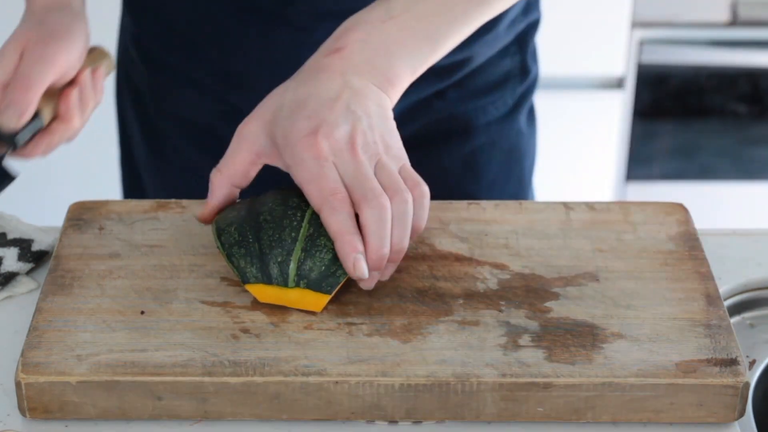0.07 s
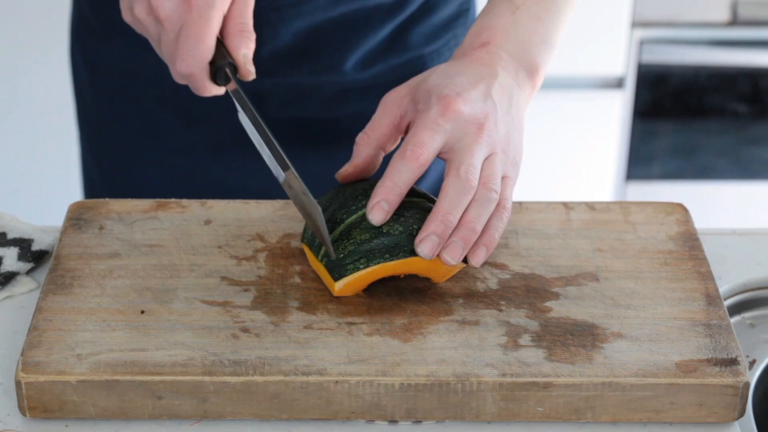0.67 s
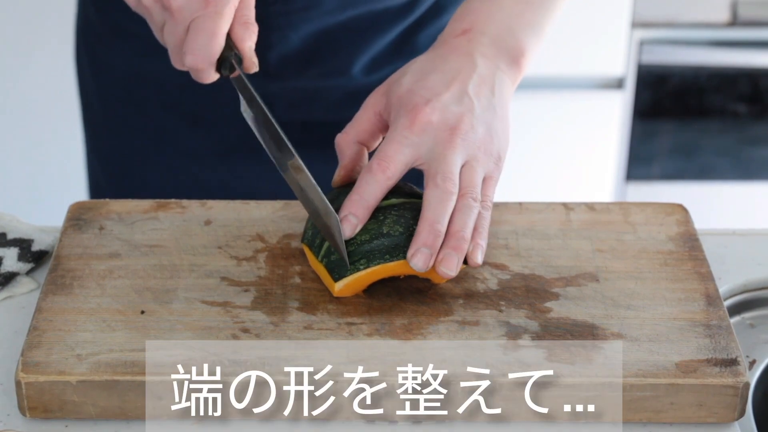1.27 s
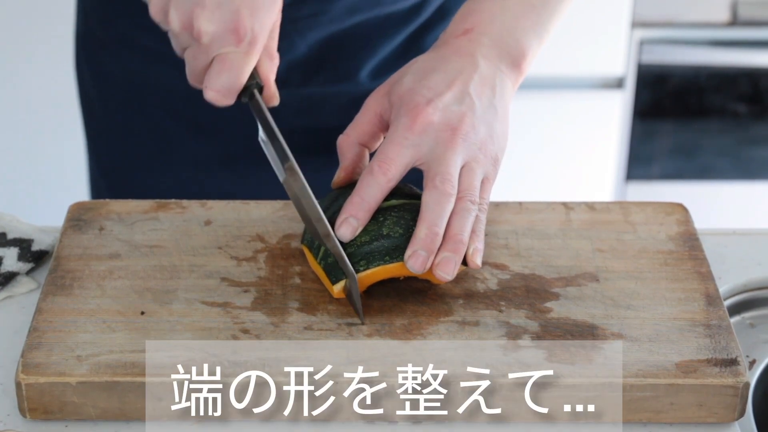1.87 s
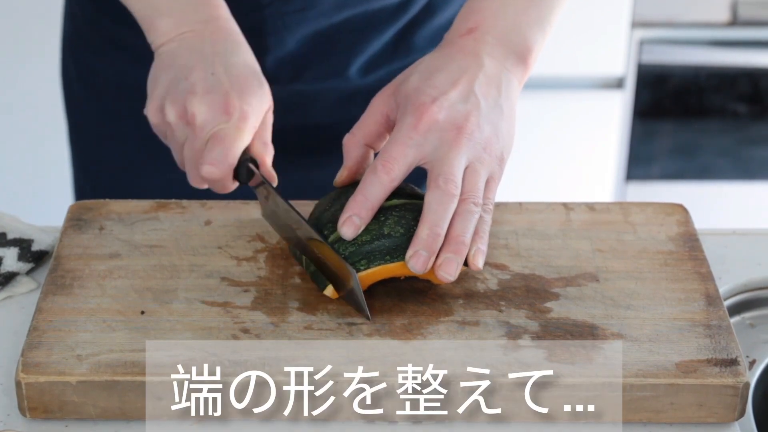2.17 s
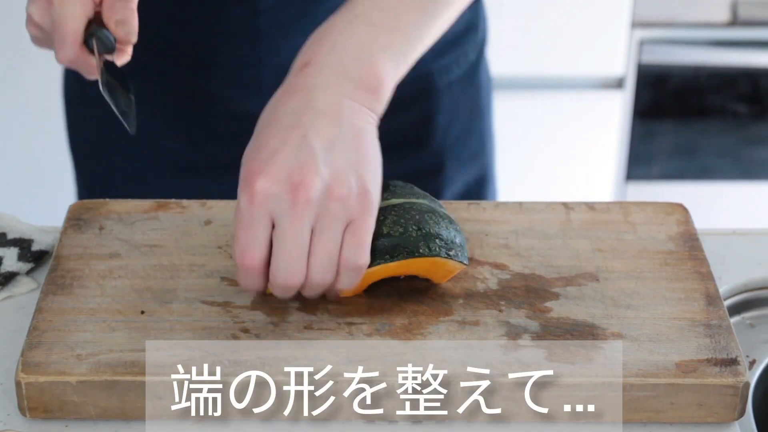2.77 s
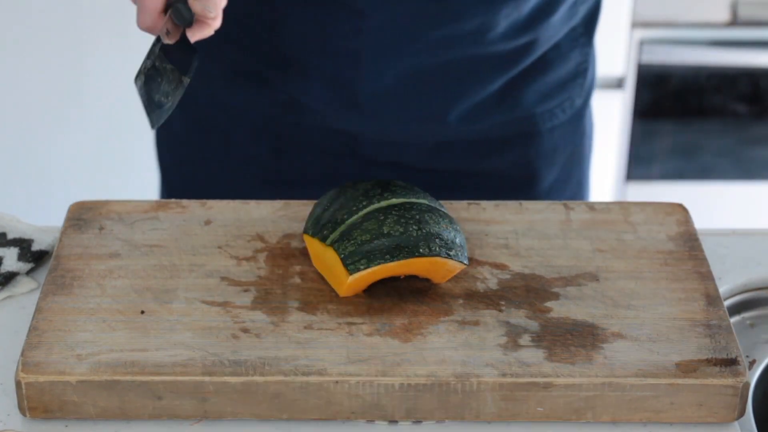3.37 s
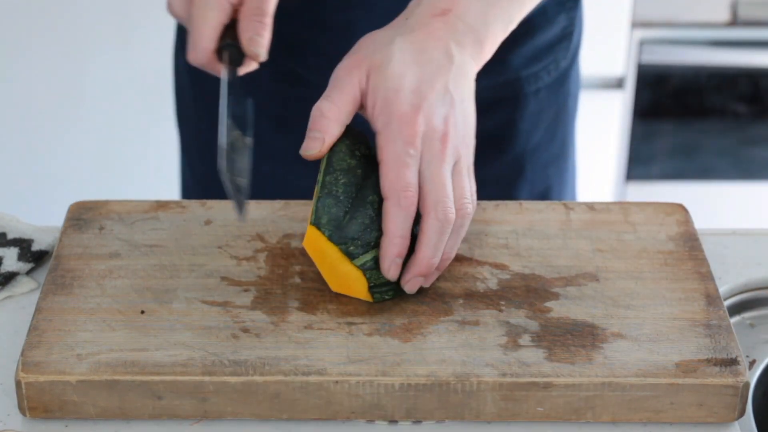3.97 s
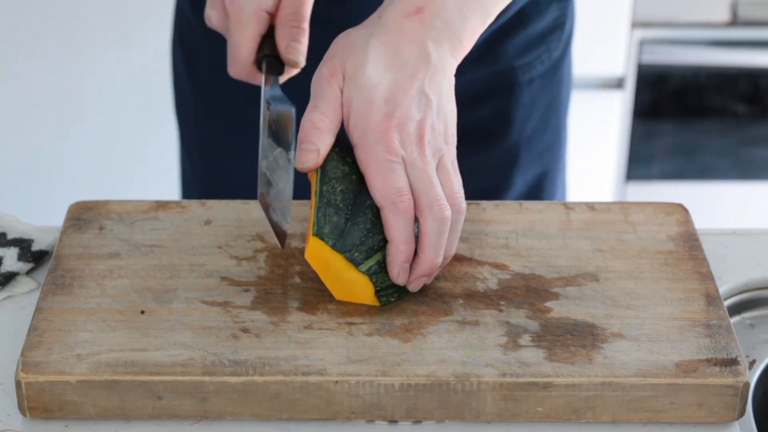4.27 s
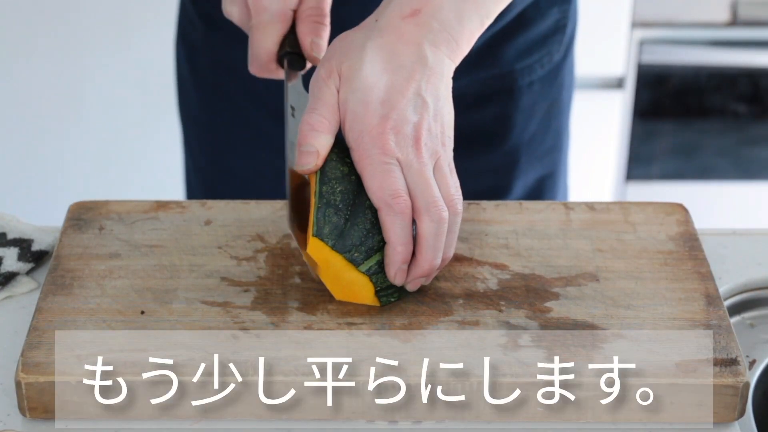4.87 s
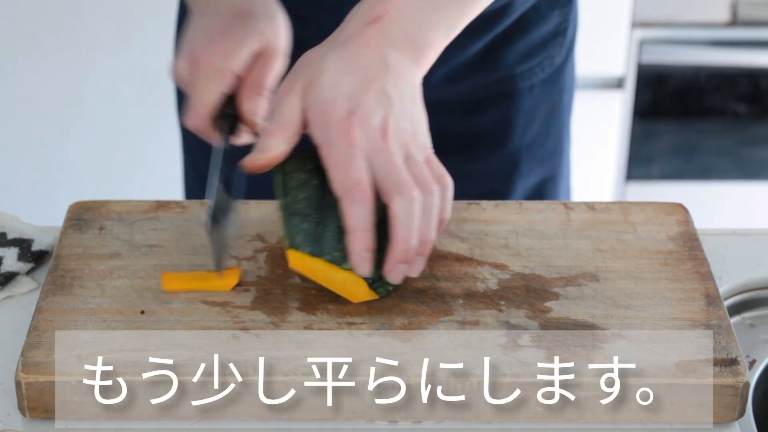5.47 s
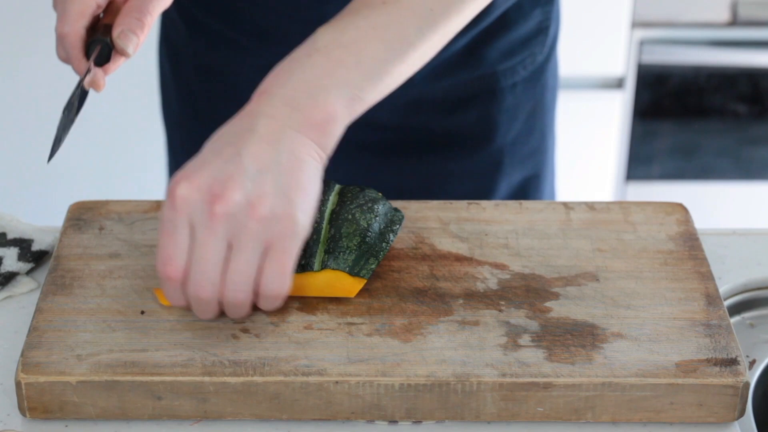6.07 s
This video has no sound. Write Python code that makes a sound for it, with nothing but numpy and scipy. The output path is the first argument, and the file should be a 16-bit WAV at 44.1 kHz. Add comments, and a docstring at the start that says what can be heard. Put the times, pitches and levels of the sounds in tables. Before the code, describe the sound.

Close sounds in a small, lively kitchen, over a faint steady appliance hum and light rustling of skin and apron. During the first second, fingers slip and squeak softly on damp pumpkin rind. From about 1.2 seconds a knife pushes through the firm flesh with a growing, crisp crunch, the rind cracking sharply at 1.7 and 2.0. The blade knocks on the wooden board at 2.3, and soft thuds follow around 2.6. One sharp finger snap comes at 3.3, then soft pats and squeaks. At 3.8 the pumpkin lands with a solid knock that booms in the counter. A second, shorter cut crunches from 4.6 and ends in a crack at 5.1. Around 5.3 the blade scrapes over the wood with a brief, high metallic squeal. Two light bumps follow near 5.5, and a firmer double knock comes at 5.9.

```python
"""A small, lively kitchen: a knife trims firm pumpkin on a thick wooden board.
Two slow cuts crunch as cells burst and the rind cracks; knocks ring the board and boom in the counter.
Between the cuts the free hand snaps its fingers and stands the pumpkin on end, with pats and squeaks.
After the second cut the blade scrapes over the wood and squeals briefly.
Skin and apron rustle; an appliance hums behind."""
import sys
import numpy as np
from scipy import signal
from scipy.fft import rfft, irfft, next_fast_len
from scipy.io import wavfile

SR = 44100
rng = np.random.default_rng(int(sys.argv[2]) if len(sys.argv) > 2 else 0)


def file_out(sig):
    """Save sig as 16-bit WAV at sys.argv[1]."""
    # one column per channel
    cols = np.atleast_2d(sig).T
    # limit, then scale
    lim = np.clip(cols, -1, 1)
    pcm = np.round(lim * 32767).astype(np.int16)
    wavfile.write(sys.argv[1], SR, pcm)


N = 269451
TIME_S = np.arange(N) / SR


def from_db(db):
    """Decibels to gain."""
    return 10 ** (np.asarray(db) / 20)


def unit_power(x):
    """Scale to RMS 1."""
    return x / np.sqrt(np.mean(x ** 2) + 1e-20)


def at_hz(points, hz):
    """Interpolate a table over log frequency."""
    points_hz, values = np.transpose(points)
    return np.interp(np.log(np.maximum(hz, 1)), np.log(points_hz), values)


def add(out, start_s, sound):
    """Mix a sound in at start_s."""
    start = int(start_s * SR)
    out[start:start + len(sound)] += sound[:N - start]


def butterworth(x, kind, hz, order=2):
    """Causal low-, high- or band-pass."""
    return signal.sosfilt(signal.butter(order, hz, kind, fs=SR, output="sos"), x)


def colour(x, spectrum):
    """Minimum-phase filter from (freq_hz, gain_db) points; unit power."""
    size = 2 * next_fast_len(len(x) // 2 + 1)
    gain = from_db(at_hz(spectrum, np.fft.rfftfreq(size, 1 / SR)))
    cepstrum = irfft(np.log(gain))
    response = np.exp(rfft(2 * cepstrum[:size // 2], size))
    return unit_power(irfft(rfft(x, size) * response)[:len(x)])


def pole_pair(hz, width_hz):
    """Denominator of one resonance."""
    radius = np.exp(-np.pi * width_hz / SR)
    return [1, -2 * radius * np.cos(2 * np.pi * hz / SR), radius ** 2]


def resonate(x, peaks):
    """Parallel resonances (freq_hz, width_hz, gain_db) of alternating sign; unit power."""
    out = 0
    for k, (hz, width_hz, gain_db) in enumerate(peaks):
        poles = pole_pair(hz, width_hz)
        gain = (-1) ** k * from_db(gain_db) * (1 - poles[2])
        out += gain * signal.lfilter([1, 0, -1], poles, x)
    return unit_power(out)


def fade(t60_s):
    """Exponential decay, 1 s buffer."""
    return np.exp(-np.log(1000) * TIME_S[:SR] / t60_s)


def ring(hz, t60_s):
    """One struck mode."""
    return np.sin(2 * np.pi * hz * TIME_S[:SR]) * fade(t60_s)


def burst(spectrum, t60_s):
    """Decaying coloured noise, starting at unit power."""
    decay = fade(t60_s)
    return colour(rng.standard_normal(SR) * decay, spectrum) * np.sqrt(np.mean(decay ** 2))


def grains(rate_per_s, spread_db):
    """Random clicks of uneven size."""
    sizes = from_db(spread_db * np.minimum(rng.exponential(1, N), 4))
    signs = rng.choice([-1, 1], N)
    return sizes * signs * (rng.random(N) < rate_per_s / SR) + 1e-18


def stroke(start_s, length_s, growth_db, release_t60_s, attack_s):
    """Push envelope: bite, ramp by growth_db to gain 1, release."""
    age_s = TIME_S - start_s
    bite = np.clip(age_s / attack_s, 0, 1)
    ramp = from_db(growth_db * (np.clip(age_s / length_s, 0, 1) - 1))
    release = np.exp(-np.log(1000) * np.maximum(age_s - length_s, 0) / release_t60_s)
    return bite * ramp * release


# freq_hz, gain_db
ROOM_NOISE_SPECTRUM = [(15, -54), (25, -12), (64, -21), (80, -11.5), (108, -2.5), (242, -12), (326, -13.5),
                       (405, -18.5), (641, -16.5), (714, -16), (818, -17.5), (1840, -23.5), (2000, -29),
                       (6560, -29.5), (16000, -44)]


def room_noise():
    """Steady, bass-heavy noise floor."""
    return from_db(-48) * colour(rng.standard_normal(N), ROOM_NOISE_SPECTRUM)


# pitch_hz, width_hz, level_db
HUM_BANDS = [(89.8, 14, -54.5), (127.14, 4.3, -55), (321.6, 27, -58), (2032, 84, -62.5)]


def appliance_hum():
    """Wavering tones of narrow-band noise."""
    out = np.zeros(N)
    for pitch_hz, width_hz, level_db in HUM_BANDS:
        band = resonate(rng.standard_normal(N), [(pitch_hz, width_hz, 0)])
        out += from_db(level_db) * resonate(band, [(pitch_hz, 2 * width_hz, 0)])
    return out


# middle_s, length_s, relative_db
ARM_MOVES = [(.32, 1.05, -49.5), (1.35, 0.6, -57), (2.205, .25, -49.5), (2.62, 0.66, -47),
             (3.2, 0.69, -51.5), (3.95, 0.88, -54), (5.547, 0.33, -56.5)]
# freq_hz, gain_db
RUSTLE_SPECTRUM = [(1000, 2.5), (2500, 0), (6000, 3), (8000, 3), (10500, -12.5), (16000, -24)]


def rustle():
    """Skin and apron friction follows arm speed, a half sine per move."""
    speed = np.zeros(N)
    for middle_s, length_s, relative_db in ARM_MOVES:
        speed += from_db(relative_db) * np.cos(np.pi * np.clip((TIME_S - middle_s) / length_s, -0.5, 0.5))
    return from_db(-2) * speed * colour(grains(rate_per_s=17000, spread_db=4.5), RUSTLE_SPECTRUM)


# start_s, rasp_db, squeak_db, pitch_hz, t60_s
FINGER_SLIPS = [(.102, -50, -47.5, 970, 0.31), (.165, -40, -48, 2670, .12), (.201, -65, -41, 1400, .11),
                (.748, -47.5, -62, 2580, 0.43), (.831, -43, -49, 1920, 0.3), (1.318, -59, -45.5, 1800, 0.1),
                (2.49, -41.5, -63, 2500, 0.1), (2.835, -49.5, -50, 1700, .09),
                (3.539, -40, -45, 1400, 0.069), (3.659, -61, -35.5, 2470, 0.035),
                (3.685, -48, -38.5, 2300, 0.043), (3.705, -44.5, -46, 840, 0.23),
                (5.456, -52, -43, 1110, .088)]


def finger_slips():
    """Fingers slip on damp rind: short rasps and squeaks."""
    out = np.zeros(N)
    rasp_spectrum = [(60, -16), (400, 4), (1800, 3), (3200, -0.5), (6500, 2.5), (10000, -16),
                     (16000, -30)]
    attack = 1 - fade(t60_s=0.0049)
    for start_s, rasp_db, squeak_db, pitch_hz, t60_s in FINGER_SLIPS:
        squeak = from_db(squeak_db) * resonate(rng.standard_normal(SR), [(pitch_hz, 110, 0)])
        rasp = from_db(rasp_db) * burst(rasp_spectrum, t60_s)
        add(out, start_s, attack * (squeak * fade(t60_s) + rasp))
    return out


# start_s, length_s, growth_db, release_t60_s, tearing_relative_db, load_relative_db
KNIFE_PUSHES = [(1.218, .22, 3, .2, -52, -52.5), (1.431, 0.099, 3, 0.28, -39, -38),
                (1.688, 0.057, 15, .1, -28, -33), (1.809, 0.21, 14.5, 0.24, -27, -31.5),
                (4.645, .14, 9, 0.53, -43.5, -43), (4.827, 0.088, 1, 0.32, -32.5, -49),
                (4.955, .036, 10, 0.035, -29.5, -47), (5.016, .122, 14, 0.18, -37.5, -48)]
# freq_hz, gain_db
TEARING_SPECTRUM = [(1180, -15), (2000, -25), (2280, -12.5), (2550, 0), (2830, -11.5), (3260, -6.5),
                    (4770, -5.5), (5160, -2.5), (6640, -0.5), (14000, -24.5), (16000, -32)]
# freq_hz, width_hz, gain_db
FLESH_RESONANCES = [(687, 46, -5), (879, 60, 2), (1320, 150, -0.5), (1745, 92, 5), (2633, 50, 0.5),
                    (3150, 51, -6)]


def cutting():
    """Four pushes a cut. Cells burst ahead of the edge: crisp hiss, coarse crunch, low blade drag."""
    tearing, load = np.zeros(N), np.zeros(N)
    for *shape, tearing_db, load_db in KNIFE_PUSHES:
        push = stroke(*shape, attack_s=0.029)
        tearing += from_db(tearing_db) * push
        load += from_db(load_db) * push
    drag_spectrum = [(25, -21), (45, 1), (120, 1), (220, -2), (450, -22), (2000, -38)]
    hiss = tearing * colour(grains(rate_per_s=6000, spread_db=2.5), TEARING_SPECTRUM)
    crunch = load * resonate(grains(rate_per_s=2100, spread_db=-1), FLESH_RESONANCES)
    drag = load * colour(grains(rate_per_s=680, spread_db=1.5), drag_spectrum)
    return from_db(-2) * hiss + from_db(-2.5) * crunch + from_db(-13) * drag


# start_s, drive_db, t60_s, highpass_hz, lowpass_hz
RIND_CRACKS = [(1.7415, -20, .035, 2000, 4500), (1.7485, -20, .008, 4000, 7000),
               (2.0147, -11.5, 0.016, 4970, 7000), (2.0170, -8, .01, 5330, 8000),
               (2.222, -28, 0.0087, 3500, 4500), (2.2386, -17, 0.0047, 3200, 6000),
               (5.1372, -14, 0.0045, 6800, 8500)]
# freq_hz, gain_db
CRACK_SPECTRUM = [(300, -22), (1500, -14), (3000, -10), (4500, 0), (7500, 0), (10500, -8), (16000, -13)]


def rind_cracks():
    """Brittle rind gives way in sharp bursts, each in its own band."""
    out = np.zeros(N)
    for start_s, drive_db, t60_s, highpass_hz, lowpass_hz in RIND_CRACKS:
        crack = from_db(drive_db) * burst(CRACK_SPECTRUM, t60_s)
        crack = butterworth(crack, "high", highpass_hz, order=4)
        add(out, start_s, butterworth(crack, "low", lowpass_hz))
    return out


# start_s, wood_db, lowpass_hz, twist_db, click_db, weight_db, push_hz
BLOWS = [(1.743, -40.5, 3030, -2, -24.5, -31.5, 58), (2.2641, -24.3, 3400, -45, -30.5, -58, 90),
         (2.617, -37, 1400, -5.5, -37.5, -32.5, 210), (2.652, -42, 1700, -10, -41, -37, 95),
         (3.7867, -19, 990, 2, -38.5, -26.5, 115), (3.7987, -36, 780, -2, -53, -37, 99),
         (4.990, -52, 1000, -8, -50, -43, 162), (5.441, -34, 820, -17, -58, -58, 110),
         (5.568, -35, 900, -7.5, -50, -33.5, 95), (5.908, -24, 1400, -26, -25, -32.5, 140),
         (5.924, -31, 1600, -14, -25.5, -36.5, 128), (5.964, -49, 2000, -8, -35, -55, 128)]
# freq_hz, gain_db, t60_s, twist_share
BOARD_MODES = [(683.4, 1, 0.1, 0.9), (718, -9, 0.12, 1), (769, -4.5, 0.11, 1), (853.6, 0.5, 0.14, 0.11),
               (895, -6, 0.095, 0.02), (1040, -9, 0.074, 0.03), (1256, -8, 0.085, 0.9),
               (1347, -14, 0.079, 1), (1510, -5, 0.06, 1), (1673, -5, 0.074, 0.27),
               (1706, -5.5, 0.037, 0.8), (1950, -14.5, .13, 0.02), (2350, -10, 0.045, 0),
               (2414, -8.5, .08, 0), (2590, 0, 0.044, 0), (3330, -9, 0.06, 0), (3590, -16, .15, 0.2),
               (4300, -18, 0.1, 0.4)]


def board_knocks():
    """Softer contacts ring only the low wood modes; where a blow lands sets the board's twist."""
    out = np.zeros(N)
    clack_spectrum = [(300, -14.5), (900, 10), (1750, 36), (3500, 15), (8000, -39)]
    click_spectrum = [(300, -4.5), (1500, -14.5), (4000, 3), (6000, -1), (8500, -12), (11000, -25),
                      (16000, -36)]
    for start_s, wood_db, lowpass_hz, twist_db, click_db, *_ in BLOWS:
        modes = sum(from_db(gain_db + twist_share * twist_db) * ring(hz, t60_s)
                    for hz, gain_db, t60_s, twist_share in BOARD_MODES)
        clack = from_db(-2.5) * burst(clack_spectrum, t60_s=0.054)   # dense, damped modes
        wood = butterworth(modes + clack, "high", 620, order=4)   # weak radiation below the first mode
        add(out, start_s, from_db(wood_db) * butterworth(wood, "low", lowpass_hz))
        add(out, start_s, from_db(click_db) * burst(click_spectrum, t60_s=0.038))
    return out


# freq_hz, gain_db, t60_s
COUNTER_MODES = [(69.8, 6.5, 0.3), (98, -2, .25), (131.4, 4.5, 0.42), (208, 7.5, .1), (215, 2, 0.25),
                 (274.5, 1.5, .15), (312.5, -1.5, .18), (360, -4, 0.074)]


def counter_thumps():
    """Each blow jolts the counter, then its full weight drives the modes near push_hz."""
    out = np.zeros(N)
    jolt_hz, settle_s, mismatch_db_per_octave = 293, 0.00893, -10
    for start_s, *_, weight_db, push_hz in BLOWS:
        jolt = (start_s, weight_db - 0.5, jolt_hz)
        weight = (start_s + settle_s, weight_db, push_hz)
        for onset_s, drive_db, centre_hz in (jolt, weight):
            for k, (hz, gain_db, t60_s) in enumerate(COUNTER_MODES):
                mismatch_db = mismatch_db_per_octave * abs(np.log2(hz / centre_hz))
                add(out, onset_s, (-1) ** k * from_db(drive_db + gain_db + mismatch_db) * ring(hz, t60_s))
    return out


# start_s, level_db, pitch_hz, t60_s
HAND_PATS = [(3.3313, -28, 153, 0.27), (3.339, -30.5, 476, 0.046), (3.484, -32, 305, .08),
             (3.496, -36, 207, 0.056), (3.575, -38, 198, 0.1), (3.660, -34, 405, 0.15),
             (3.688, -38, 420, 0.086)]


def hand_pats():
    """Soft pats: a hollow note plus dull skin noise."""
    out = np.zeros(N)
    skin_spectrum = [(30, -30), (90, -12), (170, 0), (350, -9), (800, -13), (2000, -28), (8000, -29.5),
                     (16000, -71)]
    for start_s, level_db, pitch_hz, t60_s in HAND_PATS:
        skin = from_db(-6) * burst(skin_spectrum, t60_s=0.15)
        add(out, start_s, from_db(level_db) * (ring(pitch_hz, t60_s) + skin))
    return out


# freq_hz, gain_db
SNAP_SPECTRUM = [(100, -19), (400, -9), (700, -22), (1400, -18.5), (2100, -13.5), (2900, -18), (3700, -5.5),
                 (5000, 2), (7300, -3.5), (9000, -11.5), (10500, -19.5), (16000, -30)]


def finger_snap(start_s=3.3424):
    """One pressure pulse, drawn out in the hollow of the hand, scattered by board and body."""
    out = np.zeros(N)
    pulse = colour(signal.unit_impulse(SR), SNAP_SPECTRUM) / np.sqrt(SR)
    for hz, width_hz in [(4200, 1000), (5400, 1700), (7000, 1700)]:
        poles = pole_pair(hz, width_hz)
        pulse = signal.lfilter(poles[::-1], poles, pulse)   # all-pass: delay only
    scatter = burst(SNAP_SPECTRUM, t60_s=0.045)
    add(out, start_s, from_db(9) * pulse + from_db(-21) * scatter)
    return out


# freq_hz, gain_db
SCRAPE_SPECTRUM = [(400, -13), (850, 7.5), (2600, -0.5), (4500, 0), (6000, 3), (9000, -3), (10200, -9),
                   (16000, -13)]
# freq_hz, width_hz, gain_db
BLADE_MODES = [(2320, 70, -6), (2600, 100, 3), (2950, 200, -8), (4110, 200, -3), (5700, 200, -9),
               (7050, 80, -2), (7540, 90, 1), (8370, 70, -5), (9020, 120, -2), (11100, 60, -4),
               (11800, 50, -8), (12200, 55, -9), (12950, 150, -10), (14300, 120, -15)]


def blade_scrape():
    """Sweeping the slice aside, the edge chatters over the grain and rings the steel."""
    slips = grains(rate_per_s=7500, spread_db=4)
    rasp = from_db(-38) * colour(slips, SCRAPE_SPECTRUM)
    steel = from_db(-36) * resonate(slips, BLADE_MODES)
    sweep = stroke(start_s=5.249, length_s=0.086, growth_db=-5, release_t60_s=0.19, attack_s=0.024)
    return sweep * (rasp + steel)


# pitch_hz, relative_db
SQUEAL_TONES = [(7534, -2.5), (7577, -5.5)]


def blade_squeal(start_s=5.282, attack_s=0.01):
    """Two close blade modes lock in and beat."""
    since_peak_s = TIME_S - start_s - attack_s
    tones = sum(from_db(db) * np.cos(2 * np.pi * hz * since_peak_s) for hz, db in SQUEAL_TONES)
    envelope = stroke(start_s, length_s=0.03, growth_db=-7, release_t60_s=0.29, attack_s=attack_s)
    return from_db(-28) * envelope * tones


# freq_hz, t60_s
ROOM_DECAY = [(250, 0.47), (700, 0.26), (1840, 0.31), (5000, 0.25), (9000, 0.26), (15000, 0.043)]
# delay_s, relative_db
EARLY_ECHOES = [(.0043, -6), (.0118, -21), (0.017, -10)]


def kitchen(x, wet_db):
    """Direct sound, echoes off board and near walls, and a diffuse tail that dies sooner in the treble."""
    edges_hz, tail = np.geomspace(200, 17000, 10), np.zeros(SR)
    for low_hz, high_hz in zip(edges_hz, edges_hz[1:]):
        band = butterworth(rng.standard_normal(SR), "band", [low_hz, high_hz])
        tail += band * fade(at_hz(ROOM_DECAY, np.sqrt(low_hz * high_hz)))
    tail *= 1 - fade(t60_s=0.0099)   # reflections build up
    response = tail / np.sqrt(np.sum(tail ** 2))
    for delay_s, relative_db in EARLY_ECHOES:
        response[int(delay_s * SR)] += from_db(relative_db)
    return x + from_db(wet_db) * signal.fftconvolve(x, response)[:N]


def scene():
    """Mono mix of background, hands, knife and board."""
    background = room_noise() + appliance_hum() + rustle()
    hands = kitchen(finger_slips() + hand_pats(), wet_db=-5) + kitchen(finger_snap(), wet_db=-4)
    knife = kitchen(cutting() + rind_cracks() + blade_scrape(), wet_db=-9.5) + blade_squeal()
    board = kitchen(board_knocks(), wet_db=-5.5) + counter_thumps()
    return (background + hands + knife + board)[None]


def record(dry):
    """Sub-bass cut, soft peak limit, steep treble cut."""
    highpass_hz, ceiling, lowpass_hz = 32, 1.2, 15850
    rounded = ceiling * np.tanh(butterworth(dry, "high", highpass_hz) / ceiling)
    return signal.sosfilt(signal.ellip(12, 0.1, 80, lowpass_hz, fs=SR, output="sos"), rounded)


dry = scene()
out = record(dry)
file_out(out)
```